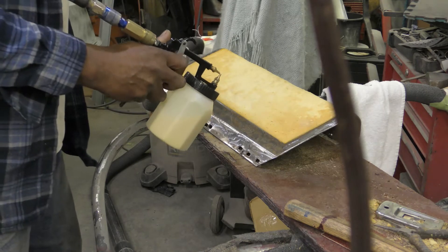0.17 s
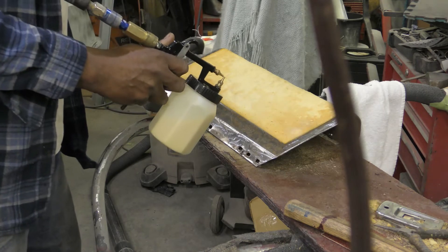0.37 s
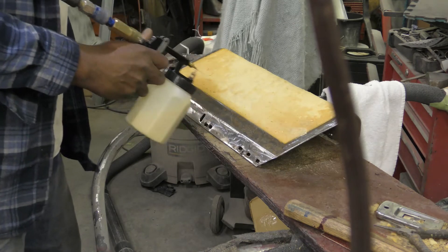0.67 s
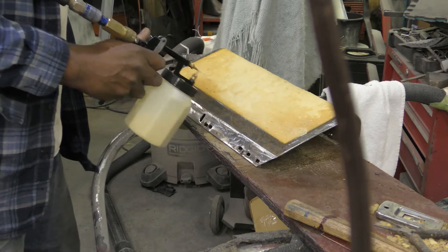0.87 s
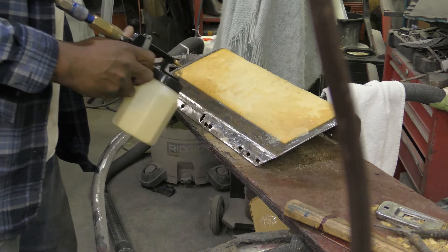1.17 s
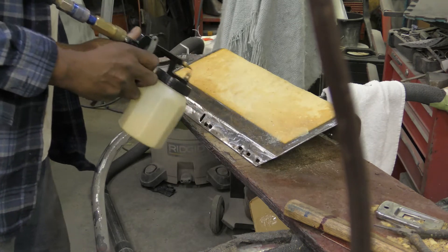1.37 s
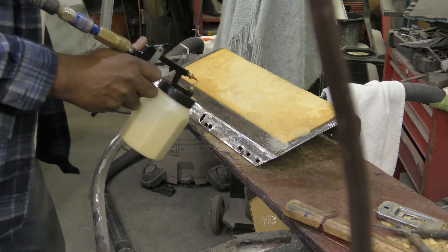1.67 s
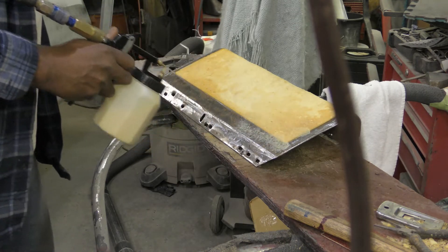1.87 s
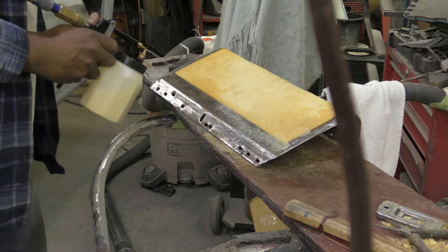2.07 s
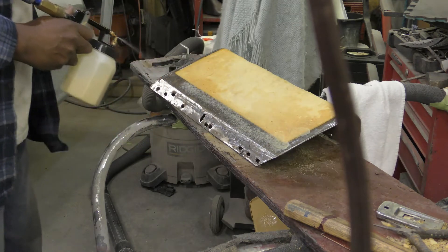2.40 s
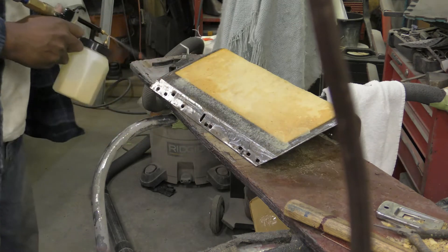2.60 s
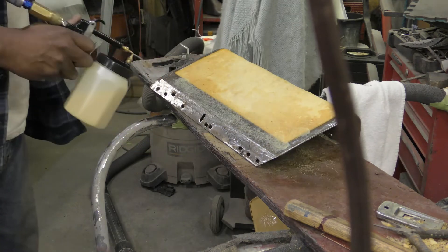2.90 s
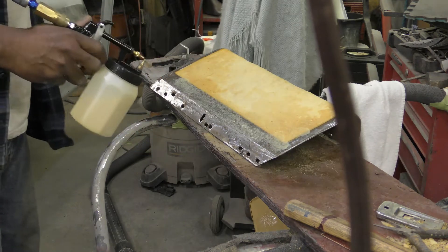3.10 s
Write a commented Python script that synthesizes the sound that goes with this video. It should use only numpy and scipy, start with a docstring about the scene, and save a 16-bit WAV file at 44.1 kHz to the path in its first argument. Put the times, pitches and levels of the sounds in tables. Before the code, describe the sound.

An air spray gun hisses loudly in two bursts, close by, in a faintly humming workshop.

```python
"""Cloth rustle and small clicks open over faint workshop hum and patchy bass; then an air spray gun hisses, close by.
Two trigger pulls thump: the first flow starts slightly low and builds; after more clicks the second surges on
stored hose pressure and settles. The hiss is shaped noise over hollow resonances; random taps with a per-band
decay give the walls' short tail. Gain control ducks the background; the level sinks at the end."""
import sys
import numpy as np
from scipy import signal
from scipy.io import wavfile
from scipy.ndimage import uniform_filter1d

SR = 44100
rng = np.random.default_rng(int(sys.argv[2]) if len(sys.argv) > 2 else 0)


def transcribe(signal):
    """Save signal, clipped to [-1, 1], as a 16-bit WAV file at the path in sys.argv[1]."""
    frames = np.atleast_2d(signal).T
    limited = np.clip(frames, -1, 1)
    pcm = np.round(limited * 32767).astype(np.int16)
    wavfile.write(sys.argv[1], SR, pcm)


def natural_amplitude(level_db):
    """Convert a level in decibels to a linear amplitude factor, elementwise."""
    exponent = np.asarray(level_db, float) / 20
    return 10 ** exponent


N = 143325
T = np.arange(N) / SR


def evened(x):
    """Scales to rms 1."""
    return x / np.sqrt(np.mean(x ** 2) + 1e-20)


def read(points, hz):
    """Interpolates a spectrum table on a log frequency axis."""
    point_hz, value = np.transpose(points)
    return np.interp(np.log(hz + 1), np.log(point_hz + 1), value)


def track(points):
    """Interpolates a (time, value) table at every sample."""
    return np.interp(T, *np.transpose(points))


def resonate(x, hz, width_hz):
    """One-pole lowpass shifted up to hz: a resonance of peak gain 1."""
    turn = np.exp(2j * np.pi * hz * T)
    pole = np.exp(-np.pi * width_hz / SR)
    return 2 * (turn * signal.lfilter([1 - pole], [1, -pole], x / turn)).real


def ring(air, hz, width_hz):
    """Noise through two equal resonances in series, rms 1."""
    return evened(resonate(resonate(air, hz, width_hz), hz, width_hz))


def noise(colour_db, likeness, size, patch_db):
    """Stereo noise, rms 1: colour_db(hz, t_s) shapes it, smoothed random patches in time and pitch vary it."""
    frames = 4 * N // size + 5
    hz = np.fft.rfftfreq(size, 1 / SR)[:, None]
    a, b, c, d, patches = rng.standard_normal((frames, len(hz), 5)).T
    patches = uniform_filter1d(patches, size=9, axis=0)  # bins
    patches = evened(uniform_filter1d(patches, size=12, axis=1))  # frames
    db = colour_db(hz, np.arange(frames) * size / 4 / SR) + 0 * a
    shape = natural_amplitude(db) / np.sqrt(np.mean(natural_amplitude(db) ** 2, 0))
    same = np.clip(read(likeness, hz), -1, 1)
    left = a + 1j * b
    right = same * left + np.sqrt(1 - same ** 2) * (c + 1j * d)
    z = np.array([left, right]) * shape * natural_amplitude(patch_db * patches)
    return evened(signal.istft(z, nperseg=size, noverlap=3 * size // 4)[1][:, :N])


# trigger pulls: open_s, shut_s, onset_db (start against settled flow), thump_db, thump_hz
PULLS = [(0.213, 0.996, -1.5, -35, 380), (1.450, 2.993, 2.5, -32, 249)]
RISE_S, RISE_DB, SETTLE_S, SHUT_T60_S = 0.011, -35, 0.03, 0.1


def valve():
    """Air flow: fast rise; the first pull starts low and builds, the second surges and settles; sharp drop."""
    flow = np.zeros(N)
    for open_s, shut_s, onset_db, *_ in PULLS:
        on_s = T - open_s
        off_s = np.maximum(T - shut_s, 0)
        rise_db = RISE_DB * np.clip(1 - on_s / RISE_S, 0, 1)
        settle_db = onset_db * np.exp(-np.maximum(on_s - RISE_S, 0) / SETTLE_S)
        flow += natural_amplitude(rise_db + settle_db - 60 * off_s / SHUT_T60_S) * (on_s > 0)
    return flow


# spectrum at aim 0: hz, density_db_per_hz
BRIGHT = [(60, -56.5), (200, -25.5), (550, -35), (836, -23), (1060, -16), (1420, -15), (1680, -13),
          (3240, -8), (3530, -9), (5070, -8), (7600, -6.5), (9120, 0), (13500, -4), (15500, -4.5)]
# spectrum at aim 1: hz, density_db_per_hz
DULLER = [(60, -42.5), (200, -25), (550, -20), (582, -41), (678, -16), (825, -26), (975, -12.5),
          (1340, -11), (3070, -6.5), (3730, -5), (5910, -6.5), (7500, -4.5), (11400, -0.5), (15500, -1.5)]
# hiss level near SHEEN_HZ: time_s, level_db
SHEEN = [(.2, -0.5), (.7, -1), (.79, -1), (1, 0.5), (1.45, -1.5), (1.9, 0.5), (2.2, 1), (2.5, 1.5),
         (2.75, -1.5), (3.05, 1)]
SHEEN_HZ, SHEEN_OCTAVES = 5740, 0.3


def jet_colour(hz, t_s):
    """Aim mixes the two spectra in power; the sheen lifts or dips one band."""
    time_s, _, aim, _ = np.transpose(JET)
    dull = np.clip(np.interp(t_s, time_s, aim), 0, 1)
    power = (1 - dull) * natural_amplitude(read(BRIGHT, hz)) ** 2 + dull * natural_amplitude(read(DULLER, hz)) ** 2
    band = np.exp(-(np.log2((hz + 1) / SHEEN_HZ) / SHEEN_OCTAVES) ** 2)
    return np.interp(t_s, *np.transpose(SHEEN)) * band + 10 * np.log10(power)


# hollow resonances the jet blows on, perhaps cup and tube: pitch_hz, width_hz, level_db
PIPE = [(252.7, 94, -2.5), (354, 92, -2), (478, 57, 1.5), (690, 27, -6.5), (921, 180, -3.5)]


def pipe_tones():
    """Air noise rings the hollow resonances together, rms 1."""
    air = rng.standard_normal(N)
    return evened(sum(natural_amplitude(level_db) * ring(air, hz, width_hz) for hz, width_hz, level_db in PIPE))


# jet as the gun sweeps: time_s, hiss_db, aim (0 bright, 1 duller), pipe_db
JET = [(0.201, -10.5, 0., -42.5), (0.502, -12.5, 0., -54), (0.718, -14.5, .2, -55), (0.782, -11, .1, -60),
       (1., -13, 0.11, -42), (1.45, -9.5, 0.15, -45), (1.749, -12.5, 0.57, -50.5),
       (1.999, -13.5, 0.23, -46), (2.198, -14, 0.45, -51), (2.349, -15.5, 0.32, -45),
       (2.4, -11.5, 0.82, -47.5), (2.6, -12, 0.8, -42), (2.7, -12, 0.49, -43.5), (2.782, -12.5, 1., -37.5),
       (2.902, -13, 0.73, -56), (3.05, -14, 0.72, -39)]
# hiss stereo: hz, left_right_likeness
JET_LIKENESS = [(100, 1), (1300, 1), (4400, 0.95), (7500, 1), (10000, 0.95), (15000, .84)]
PATCH_DB, FLICKER_DB = 1.78, 0.32


def jet():
    """Turbulent hiss coloured by aim, hollow tones under it, both gated by the valve."""
    time_s, hiss_db, _, pipe_db = np.transpose(JET)
    hiss = noise(jet_colour, JET_LIKENESS, size=1024, patch_db=PATCH_DB)
    flicker = evened(uniform_filter1d(rng.standard_normal(N), size=300))
    hiss = hiss * natural_amplitude(np.interp(T, time_s, hiss_db) + FLICKER_DB * flicker)
    pipe = pipe_tones() * natural_amplitude(np.interp(T, time_s, pipe_db))
    return valve() * (hiss + pipe)


THUMP_S, THUMP_LAG_S = 0.0022, 0.013


def thumps():
    """Low push of air as the valve opens: a cosine under a Gaussian."""
    out = np.zeros(N)
    for open_s, _, _, thump_db, thump_hz in PULLS:
        u = T - open_s - THUMP_LAG_S
        out += natural_amplitude(thump_db) * np.exp(-(u / THUMP_S) ** 2) * np.cos(2 * np.pi * thump_hz * u)
    return out


# clicks and scrapes of trigger and fittings: start_s, level_db, centre_hz, width_hz, t60_s
CLICKS = [(0.023, -51.5, 5200, 4000, 0.081), (.091, -61.5, 2200, 1200, .05),
          (.099, -52.5, 10570, 6000, .025), (.099, -53.5, 1250, 400, .09), (.132, -48, 7100, 6900, .015),
          (.132, -50.5, 3500, 1015, .04), (0.14, -57, 7430, 5080, 0.023), (.15, -54.5, 1920, 703, 0.087),
          (1.338, -46.5, 2000, 3000, .025), (1.338, -53.5, 8930, 7000, 0.0216)]


def clicks():
    """Each click is a dry, decaying noise burst in one band."""
    out = np.zeros(N)
    for start_s, level_db, centre_hz, width_hz, t60_s in CLICKS:
        burst = ring(rng.standard_normal(N), centre_hz, width_hz)
        fall_db = 60 * np.maximum(T - start_s, 0) / t60_s
        out += burst * natural_amplitude(level_db - fall_db) * (T > start_s)
    return out


# wall tail: hz, level_db, t60_s
SHOP = [(200, -15.5, 0.33), (800, -9.5, 0.33), (1390, -8.5, 0.35), (2200, -9, 0.43), (3500, -7, 0.38),
        (6000, -5.5, .28), (10000, -10.5, 0.24), (15000, -8, .2)]
# wall tail stereo: hz, left_right_likeness
SHOP_LIKENESS = [(300, 0.955), (800, .9), (1400, 0.74), (4000, 0.23), (6000, 0.68), (7500, .93),
                 (9500, 0.56), (15000, .6)]
BEND = 1.43  # the tail falls slowly at first, then faster


def shop(x):
    """Wall reflections: sparse random taps, each band with its own level and decay."""
    taps = np.zeros((2, SR // 2))
    at = np.arange(200, SR // 2 - 20, 20)
    at = at + rng.integers(0, 20, (2, len(at)))
    np.put_along_axis(taps, at, rng.choice([-1., 1.], at.shape), 1)
    hz, t_s, z = signal.stft(taps, SR, nperseg=256)
    same = np.clip(read(SHOP_LIKENESS, hz), 0, 1)[:, None]
    z[1] = same * z[0] + np.sqrt(1 - same ** 2) * z[1]
    band_hz, level_db, t60_s = np.transpose(SHOP)
    decay = natural_amplitude(-60 * (t_s / np.interp(hz, band_hz, t60_s)[:, None]) ** BEND)
    decay *= natural_amplitude(np.interp(hz, band_hz, level_db))[:, None] / np.linalg.norm(decay, axis=1)[:, None]
    tail = signal.istft(z * decay, SR, nperseg=256)[1] * np.sqrt(20 / 128)
    return signal.fftconvolve(x.mean(0)[None], tail, axes=1)[:, :N]


# cloth and hands: time_s, level_db
RUSTLE = [(0, -54), (.03, -55), (.07, -68), (.12, -61.5), (.16, -60.5), (.21, -61.5), (1.2, -67),
          (1.35, -68), (3.25, -67.5)]
# rustle spectrum: hz, density_db_per_hz
RUSTLE_COLOUR = [(500, -25.5), (1200, -2.5), (2500, -1), (4000, -4), (7000, -12.5), (12000, -17)]
# background stereo: hz, left_right_likeness
FLOOR_LIKENESS = [(60, 0.94), (500, .9), (1500, .75), (4000, .6), (7000, .85), (15000, .7)]


def rustle():
    """Near cloth and hands: patchy shaped noise under a level curve."""
    cloth = noise(lambda hz, t_s: read(RUSTLE_COLOUR, hz), FLOOR_LIKENESS, size=256, patch_db=2.0)
    return cloth * natural_amplitude(track(RUSTLE))


# machine hum: pitch_hz, width_hz, level_db
HUM = [(114.4, 8.8, -68.5), (172.7, 20, -63.5), (196.2, 16, -63.5), (242.7, 12, -66), (354.3, 12, -67),
       (410.4, 10, -70.5), (477, 15, -66.5)]


def hum():
    """Distant machines: narrow resonances on noise, so each tone wavers."""
    air = rng.standard_normal(N)
    return sum(natural_amplitude(level_db) * ring(air, hz, width_hz) for hz, width_hz, level_db in HUM)


# broad wash spectrum: hz, density_db_per_hz
FLOOR = [(30, -25), (60, -18), (130, -17.5), (200, -14), (300, -16.5), (500, -24.5), (600, -30),
         (800, -28.5), (1100, -22.5), (2500, -29), (4500, -36), (7000, -43), (12500, -34), (15000, -42),
         (16000, -47)]
FLOOR_DB = -57.5


def wash():
    """Distant machines blurred into steady shaped noise."""
    return natural_amplitude(FLOOR_DB) * noise(lambda hz, t_s: read(FLOOR, hz), FLOOR_LIKENESS, size=2048, patch_db=1.0)


# bass noise spectrum: hz, density_db_per_hz
BASS = [(25, -6.5), (60, -0.5), (110, -3.5), (160, -26.5), (300, -61)]
BASS_DB, BASS_PATCH_DB = -71.5, 5.5


def patchy_bass():
    """Faint bass noise whose level comes and goes in random patches."""
    bass = noise(lambda hz, t_s: read(BASS, hz), FLOOR_LIKENESS, size=2048, patch_db=BASS_PATCH_DB)
    return natural_amplitude(BASS_DB) * bass


def scene():
    """The gun, its reflections, the rustle and the background."""
    gun = jet() + thumps() + clicks()
    return gun + shop(gun) + rustle() + hum() + wash() + patchy_bass()


KNEE_DB, SLOPE, GRAB_S, RECOVER_DB_PER_S = -33.5, 0.53, 0.013, 9.5


def gain_cut_db(x):
    """Gain control: cuts power above the knee, grabs fast, recovers at a fixed rate."""
    keep = np.exp(-1 / (GRAB_S * SR))
    power = signal.lfilter([1 - keep], [1, -keep], (x ** 2).mean(0))
    cut_db = SLOPE * np.maximum(10 * np.log10(power + 1e-12) - KNEE_DB, 0)
    recovery_db = RECOVER_DB_PER_S * T
    cut_db = np.maximum.accumulate(cut_db + recovery_db) - recovery_db
    return signal.lfilter([1 - keep], [1, -keep], cut_db)


FADE_START_S, FADE_S, FADE_DB, EDGE_HZ = 3.019, 0.16, 14.5, 15620


def band_limit(x):
    """A steep low-pass at the top of the band."""
    return signal.sosfilt(signal.butter(12, 16990, fs=SR, output="sos"), x)


def record(dry):
    """Gain control, sinking level at the end, then a steep lowpass."""
    fade_db = FADE_DB * np.clip((T - FADE_START_S) / FADE_S, 0, 1)
    levelled = dry / natural_amplitude(gain_cut_db(dry) + fade_db)
    lowpass = signal.firwin(767, EDGE_HZ, window=("kaiser", 9), fs=SR)[None]
    mix = signal.oaconvolve(levelled, lowpass, "same")
    return band_limit(mix)


dry = scene()
out = record(dry)
transcribe(out)
```